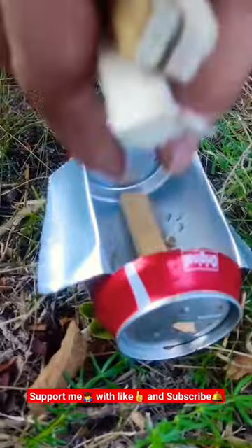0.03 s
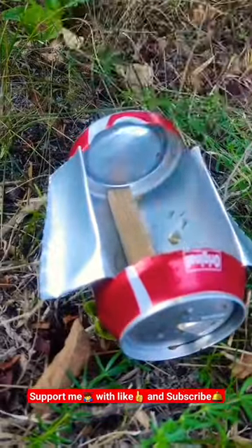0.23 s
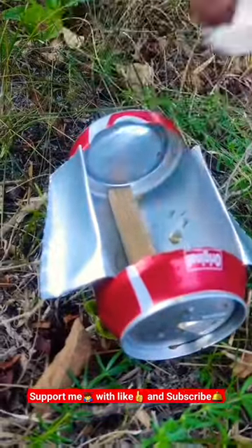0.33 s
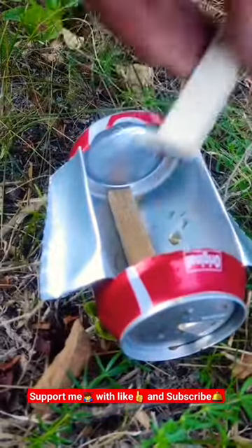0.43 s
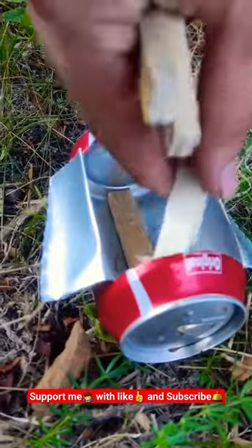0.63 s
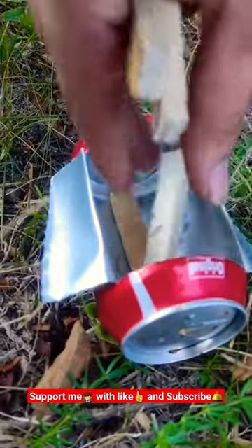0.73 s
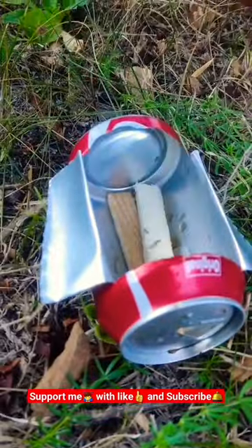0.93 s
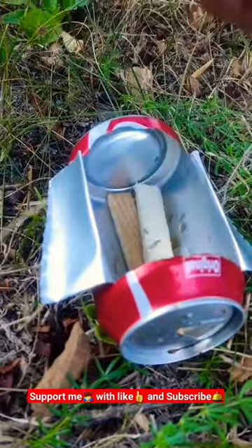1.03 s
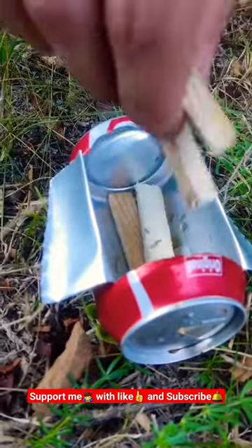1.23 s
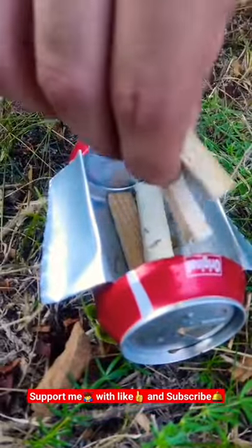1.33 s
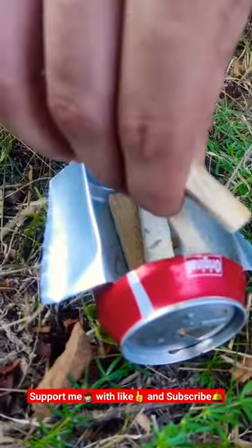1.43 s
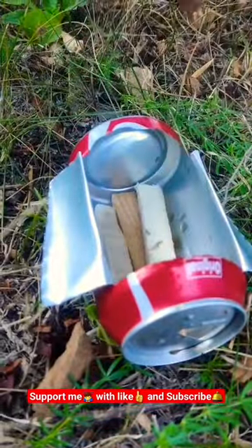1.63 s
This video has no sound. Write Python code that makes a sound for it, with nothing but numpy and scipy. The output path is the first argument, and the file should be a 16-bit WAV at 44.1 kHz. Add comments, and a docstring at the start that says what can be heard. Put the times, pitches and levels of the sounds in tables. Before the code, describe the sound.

Wooden sticks drop one after another into a drinks can, clanking briefly over distant birdsong.

```python
"""A soft outdoor hiss, a low hum, light wind and a far-off bird's whistle come first. Then two small wooden
sticks drop, one after the other, into a cut-open drinks can lying on grass. Each clatters on the thin metal,
which clanks, rings briefly and sizzles as the stick slides to rest. The can taps the soil, soft rustles come
and go, and a second bird trills in the distance."""
import sys
import numpy as np
from scipy import signal
from scipy.fft import rfft, irfft
from scipy.io import wavfile
from scipy.ndimage import uniform_filter1d

SR = 44100
rng = np.random.default_rng(int(sys.argv[2]) if len(sys.argv) > 2 else 0)


def store_pcm(level_fs):
    """Save levels as 16-bit WAV."""
    pcm = np.round(np.clip(level_fs, -1, 1) * 32767).astype(np.int16)
    wavfile.write(sys.argv[1], SR, np.atleast_2d(pcm).T)


N = 74970
T = np.arange(N) / SR
HZ = np.maximum(np.fft.rfftfreq(N, 1 / SR), 1)
EARS = np.array([[.5], [-.5]])  # splits a difference between left and right

# The outdoor hiss. Each row: frequency in Hz, relative level in dB.
AIR_COLOUR = [(25, -7), (55, -8), (90, -12), (165, -4.5), (230, -19), (320, -14), (500, -26), (1200, -26.5),
              (3000, -23.5), (6000, -24.5), (9000, -25.5), (13000, -30.5), (14300, -35.5)]
# Wind on the microphone. Each row: time in seconds, level in dB.
WIND_LEVELS = [(0, -53.5), (.4, -56.5), (.85, -59), (1.02, -46), (1.1, -51.5), (1.22, -50.5), (1.4, -57.5),
               (1.7, -55)]
# One bird's whistles. Each row: start in seconds, length in seconds, level in dB.
BIRD_WHISTLES = [(-.12, .19, -60), (.825, 0.14, -58.5), (1.083, 0.067, -67), (1.133, .145, -62),
                 (1.28, 0.045, -67)]
# The other bird's trills. Each row: start in seconds, length in seconds, level in dB.
BIRD_TRILLS = [(0.156, 0.028, -52.5), (0.383, 0.14, -56.5), (0.786, 0.068, -53), (1.317, 0.052, -51.5),
               (1.692, .08, -49.5)]
# Soft rustling swishes. Each row: loudest moment in seconds, half width in seconds, level in dB.
RUSTLE_SWELLS = [(0.151, 0.0071, -55), (.37, 0.051, -55.5), (1.09, 0.041, -63), (1.29, 0.044, -64)]
# A stick slides on the metal. Each row: start in seconds, length in seconds, level in dB.
STICK_SLIDES = [(0.181, 0.07, -39), (0.24, 0.057, -38), (0.926, .052, -35), (1.004, 0.043, -50)]
# The thin wall's crowded, fast-fading vibrations. Each row: frequency in Hz, relative level in dB.
WALL_COLOUR = [(120, -16.5), (250, -15.5), (400, -9), (800, 1.5), (1200, 4), (1700, -5), (2300, -3),
               (2750, -8), (3100, -13.5), (3500, -3), (4000, -11), (5100, -6), (7500, -7), (9200, -10),
               (11300, -8.5), (13300, -13.5), (14300, -29)]
# Wood hits the can; the tone depends on the spot. Each row: start in seconds, level in dB, extra bass,
# middle, upper ring and treble in dB, left minus right in dB, a factor on the fade times.
STICK_KNOCKS = [(0.2004, -19, 7, -4, -17, -19, -2, 1), (.208, -17.5, 7, -1, -9, -23, -5.5, 1),
                (.2229, 0.5, 3.5, -1, 0, -3.5, -1.5, 0.87), (0.2326, -11.5, 4.5, -11, -2, -3, -8.5, 0.89),
                (0.2379, -8, -10, 3, -14, -1.5, -2, 0.99), (.2430, 1.5, 2, -5, -9.5, -0.5, -2, 0.81),
                (0.246, -10, -1, 10, 14, -1, 0, 0.98), (.254, -14.5, 7.5, -8, 8, 3, 2, 0.81),
                (.259, -18, -14, 14, 9, 1, -3, 1), (.264, -17.5, -4, 1, 2, -3, 4, 1),
                (0.2771, -9, -4.5, -5, 1.5, -8, 5.5, 0.8), (.2805, -12, -3.5, 5, 5, 2, -5.5, 0.5),
                (.2835, -8.5, -1.5, 5.5, 11.5, -9.5, 0.5, 0.63), (.301, -20.5, 4, -3, -11, -25, 2.5, 0.95),
                (.9380, -13, -1.5, 2, 2.5, 1.5, -4, 0.43), (.9435, -6, 6, 6.5, -6, -7.5, -7, 0.54),
                (0.948, -21, 10, -6, -17, 7.5, 1.5, 1), (.951, -20.5, 4, -2, 7.5, 8, -5, 0.97),
                (.9635, -20.5, 4, 4, -4, 1, -2, 0.88), (0.971, -22.5, 3, -7, 1, -5, 3, 0.62),
                (1.0092, -31, -11, -4, -2, 7.5, -9, 0.53), (1.0135, -29.5, 10, -13, 5, 2, -2, 0.57),
                (1.033, -62, -12, -6, 0, 4, 0, .6)]
# Where a knock's tone is set, in Hz: bass, two points with no boost, middle, upper ring, treble.
KNOCK_BANDS_HZ = (450, 950, 1200, 1550, 2150, 4500)
# The can's own notes, before each knock adjusts them. Each row: pitch in Hz, level in dB,
# fade time in seconds (the time to drop 60 dB), the left ear's head start in radians.
CAN_NOTES = [(416, -37, 0.07, -0.9), (526.3, -35, 0.118, -1.5), (837, -26, 0.081, 4),
             (1055.5, -27, .17, 1.35), (1115, -30, 0.24, -2), (1177, -10, .03, -2), (1358, -25, .06, -2.5),
             (1641, -33.5, .14, 1.5), (2122, -24.5, .07, 0.9), (2169, -27.5, 0.084, 0.24),
             (2200, -40, 0.26, -1.4), (2835, -36, 0.14, 6), (3540, -34.5, 0.026, 3.0),
             (5016, -29.5, 0.036, 2), (5380, -23, 0.02, 4.4), (6910, -27, 0.086, 3), (7220, -41, 0.02, 8),
             (8410, -36.5, 0.063, 3), (11440, -33.5, 0.043, 3.5)]
# Extra notes on some landings. Each row: start in seconds, level in dB, pitch in Hz, fade in seconds.
LANDING_PINGS = [(.2240, -21.5, 5270, .028), (0.2452, -25.5, 5030, 0.038), (0.9452, -33.5, 530, 0.084),
                 (.9445, -31, 775, .035), (.952, -35.5, 1033, 0.16)]
# The can taps the soil. Each row: start in seconds, relative level in dB, treble cutoff in Hz.
SOIL_TAPS = [(.224, -10.5, 400), (.244, -12.5, 400), (.278, -18, 400), (0.399, -25, 300),
             (0.4121, -22.5, 920), (0.4466, -28.5, 940), (1.009, -16, 600), (1.03, -29, 500),
             (1.105, -28, 346)]
# The two microphone openings hear differently. Each row: frequency in Hz, left minus right in dB.
MIC_BALANCE = [(500, -0.5), (1600, 0), (2600, -0.5), (5300, 1), (6400, -2), (7400, -5.5), (8600, -9.5),
               (9600, 2.5), (11000, 4), (13500, 2.5)]

AIR_ALIKE_BELOW_HZ, CAN_ALIKE_BELOW_HZ, CAN_LAG_S = 360, 1600, .00026
CRACK_DB, CRACK_FADE_S, TAIL_DB, TAIL_FADE_S = -13.5, .015, -42.5, .25
SIZZLE_DB, SIZZLE_FADE_S, SIZZLE_BASS_DB, SIZZLE_ABOVE_HZ = -25, .11, -5, 3900
LOADED_PITCH, LOADED_FROM_S = .93, .9  # the second stick weighs the can down and lowers its notes


def from_db(db):
    """Turn decibels into a number to multiply by."""
    return 10 ** (np.asarray(db) / 20)


def unit_power(x):
    """Scale a sound to an average power of one."""
    return x / np.sqrt(np.mean(x ** 2) + 1e-20)


def read_curve(points):
    """Join a table's points into a level for every frequency."""
    hz, db = np.transpose(points)
    return np.interp(np.log(HZ), np.log(hz), db)


def colour(x, db):
    """Turn each frequency up or down, with no ringing ahead of the sound (a minimum-phase filter)."""
    cepstrum = irfft(np.log(from_db(db)), N)
    cepstrum[..., 1:N // 2] *= 2
    cepstrum[..., N // 2 + 1:] = 0
    return irfft(rfft(x) * np.exp(rfft(cepstrum)), N)


def convolve(x, response):
    """Let every sample of a sound set off a stereo ring or echo."""
    return signal.fftconvolve(np.atleast_2d(x), response, axes=1)[:, :N]


def stereo_noise(alike_below_hz, left_lag_s=0):
    """An even hiss, shared by both ears in the bass and unrelated in the treble."""
    shared = 1 / (1 + (HZ / alike_below_hz) ** 2)
    white = rfft(rng.standard_normal((3, N)))
    lag = np.exp(-2j * np.pi * HZ * left_lag_s * np.array([[1], [0]]))
    return irfft(np.sqrt(shared) * white[0] * lag + np.sqrt(1 - shared) * white[1:], N)


def noise_band(hz, width_hz):
    """Noise around one pitch: a wavering tone if narrow, a hiss if wide."""
    spectrum = rfft(stereo_noise(AIR_ALIKE_BELOW_HZ))
    return unit_power(irfft(spectrum / (1 + (2 * (HZ - hz) / width_hz) ** 2), N))


def outdoors():
    """Soft air, a distant hum and a faint high whine go on throughout."""
    air = unit_power(colour(stereo_noise(AIR_ALIKE_BELOW_HZ), read_curve(AIR_COLOUR)))
    hum = noise_band(hz=146.2, width_hz=9.1)
    whine = noise_band(hz=6373, width_hz=190)
    return from_db(-56.5) * air + from_db(-60.5) * hum + from_db(-64.5) * whine


def wind(below_hz=55, pan_db=2):
    """Light puffs hit the microphone and rumble in each ear separately."""
    rumble = irfft(rfft(rng.standard_normal((2, N))) / (1 + (HZ / below_hz) ** 4), N)
    level_db = np.interp(T, *np.transpose(WIND_LEVELS))
    return unit_power(rumble) * from_db(level_db + pan_db * EARS)


def whistles(from_hz=4300, to_hz=4500, flicker_db=4.5, flicker_s=.015):
    """A bird's thin, flickering notes swell and fade as their pitch rises."""
    song = np.zeros(N)
    flicker = flicker_db * np.interp(T, np.arange(400) * flicker_s, rng.standard_normal(400))
    for start, length, db in BIRD_WHISTLES:
        progress = np.clip((T - start) / length, 0, 1)
        hz = from_hz + (to_hz - from_hz) * np.sin(np.pi * progress / 2)
        swell = np.abs(np.sin(np.pi * progress ** .94))
        song += from_db(db + flicker) * swell * np.sin(2 * np.pi * np.cumsum(hz) / SR)
    return song


def rustles():
    """Brief, soft rustling swishes."""
    swell = sum(from_db(db) * np.exp(-((T - peak) / width) ** 2) for peak, width, db in RUSTLE_SWELLS)
    return swell * noise_band(hz=9400, width_hz=13000)


def trills(centre_hz=6617, swing_hz=90, rate_hz=105, edge_s=.0046):
    """A second bird flutters its pitch so fast that it buzzes."""
    song = np.zeros(N)
    for start, length, db in BIRD_TRILLS:
        unsteady = unit_power(uniform_filter1d(rng.standard_normal(N), size=200))
        hz = centre_hz + swing_hz * (np.sin(2 * np.pi * rate_hz * T) + .5 * unsteady)
        on_off = np.clip(np.minimum(T - start, start + length - T) / edge_s, 0, 1)
        song += from_db(db) * on_off * np.sin(2 * np.pi * np.cumsum(hz) / SR)
    return song


def among_trees(song, echo_db=-.5, fade_s=.3):
    """Birdsong scatters among the trees and gains a short echo."""
    echo = unit_power(rng.standard_normal((2, N)) * from_db(-60 * T / fade_s)) / np.sqrt(N)
    return song + from_db(echo_db) * convolve(song, echo)


def metal_wall(x, uneven_db=4, step_hz=156.9):
    """The thin wall colours a sound, a little unevenly and differently for each ear."""
    steps_hz = np.arange(400) * step_hz
    ripple = np.array([np.interp(HZ, steps_hz, row) for row in rng.standard_normal((2, 400))])
    db = read_curve(WALL_COLOUR) + uneven_db * ripple
    return colour(x, db - 10 * np.log10(np.mean(from_db(db) ** 2)))


def slides(clicks_per_s=2300, spread_db=2.5):
    """Wood grain catches on the metal in a dense run of tiny clicks."""
    pressure = np.zeros(N)
    for start, length, db in STICK_SLIDES:
        progress = np.clip((T - start) / length, 0, 1)
        pressure += from_db(db) * np.abs(np.sin(np.pi * progress)) ** .94
    catches = rng.random(N) < clicks_per_s / SR
    clicks = catches * from_db(-spread_db * rng.standard_normal(N)) * rng.choice([-1, 1], N)
    crack = stereo_noise(CAN_ALIKE_BELOW_HZ, CAN_LAG_S) * from_db(-60 * T / CRACK_FADE_S)
    return metal_wall(convolve(unit_power(clicks) * pressure, unit_power(crack) / np.sqrt(N)))


def knocks(ring_rise_s=.0009, crack_rise_s=.00044):
    """Each hit rings the can's notes and sets off a crack and a sizzle in its wall."""
    rings, cracks, sizzles = np.zeros((3, 2, N))
    t = T[:N // 4]
    crack_rise = 1 - np.exp(-t / crack_rise_s)
    for start, db, bass, middle, upper, treble, pan_db, fade_factor in STICK_KNOCKS:
        click = np.zeros(N)
        click[int(start * SR)] = 1
        tone_db = np.interp(np.log(HZ), np.log(KNOCK_BANDS_HZ), [bass, 0, 0, middle, upper, treble])
        push = colour(click, db + tone_db) * from_db(pan_db * EARS)
        pitch = LOADED_PITCH if start > LOADED_FROM_S else 1
        fall = -60 * t / fade_factor  # a resting stick cuts the ringing short
        ring = sum(from_db(note_db + fall / fade_s) * np.sin(2 * np.pi * pitch * hz * t + lead * EARS)
                   for hz, note_db, fade_s, lead in CAN_NOTES)
        rings += convolve(push, ring * (1 - np.exp(-t / ring_rise_s)))
        shiver = stereo_noise(CAN_ALIKE_BELOW_HZ, CAN_LAG_S)[:, :len(t)] * crack_rise
        crack_fade = from_db(CRACK_DB + fall / CRACK_FADE_S) + from_db(TAIL_DB + fall / TAIL_FADE_S)
        cracks += convolve(push, shiver * crack_fade)
        sizzles += convolve(push, shiver * from_db(SIZZLE_DB + fall / SIZZLE_FADE_S))
    bright_sizzles = colour(sizzles, SIZZLE_BASS_DB / (1 + (HZ / SIZZLE_ABOVE_HZ) ** 4))
    return rings + metal_wall(cracks + bright_sizzles)


def pings():
    """Some landings bring out a short note of the stick or the spot it hits."""
    notes = np.zeros(N)
    for start, db, hz, fade_s in LANDING_PINGS:
        since = np.maximum(T - start, 0)
        notes += from_db(db - 60 * since / fade_s) * np.sin(2 * np.pi * hz * since)
    return notes


def taps(gain_db=-6.5, fade_s=.012, above_hz=170):
    """The can shifts on the soil with dull taps that do not ring."""
    thuds = np.zeros((2, N))
    bass_cut_db = 10 * np.log10(1 + (above_hz / HZ) ** 3)  # a light can gives off no deep bass
    for start, db, cutoff_hz in SOIL_TAPS:
        since = np.maximum(T - start, 0)
        burst = stereo_noise(CAN_ALIKE_BELOW_HZ) * (T >= start) * from_db(db - 60 * since / fade_s)
        treble_cut_db = 10 * np.log10(1 + (HZ / cutoff_hz) ** 3)
        thuds += colour(burst, gain_db - treble_cut_db - bass_cut_db)
    return thuds


def scene():
    """The can close by, with quiet outdoor sounds around it."""
    can = knocks() + pings() + slides() + taps()
    return can + rustles() + among_trees(whistles() + trills()) + outdoors() + wind()


def record(dry, cutoff_hz=14200):
    """The two microphone openings colour the treble differently; the very top is cut steeply."""
    heard = colour(dry, read_curve(MIC_BALANCE) * EARS)
    return signal.sosfilt(signal.ellip(10, .3, 70, cutoff_hz, fs=SR, output="sos"), heard)


dry = scene()
out = record(dry)
store_pcm(out)
```